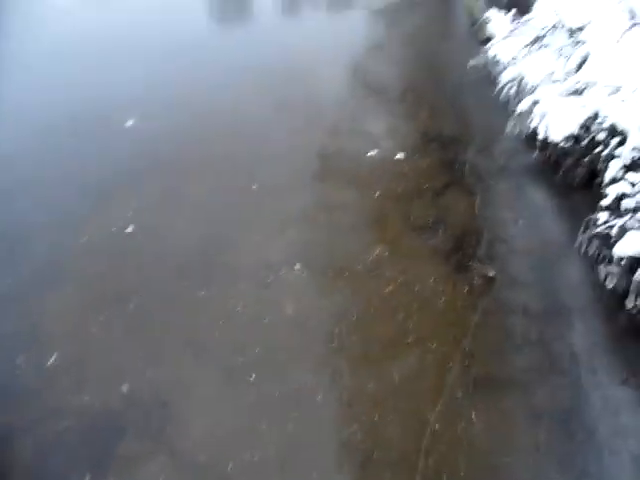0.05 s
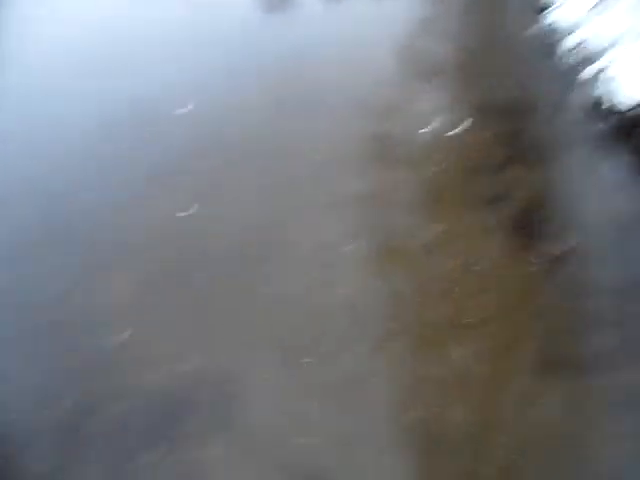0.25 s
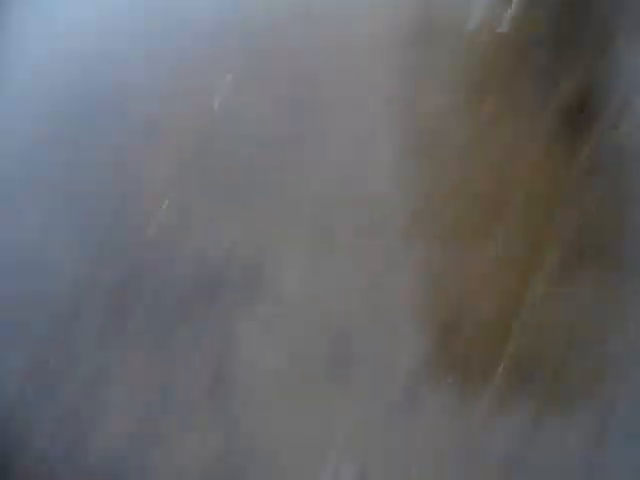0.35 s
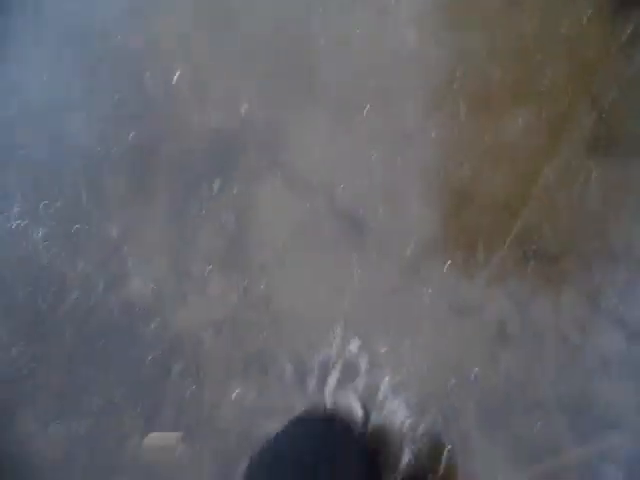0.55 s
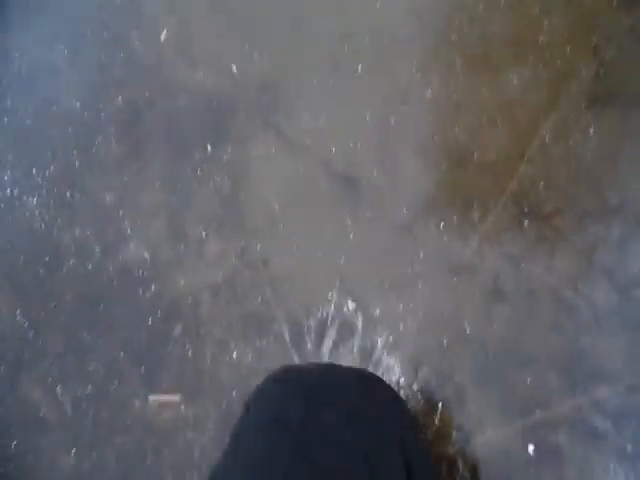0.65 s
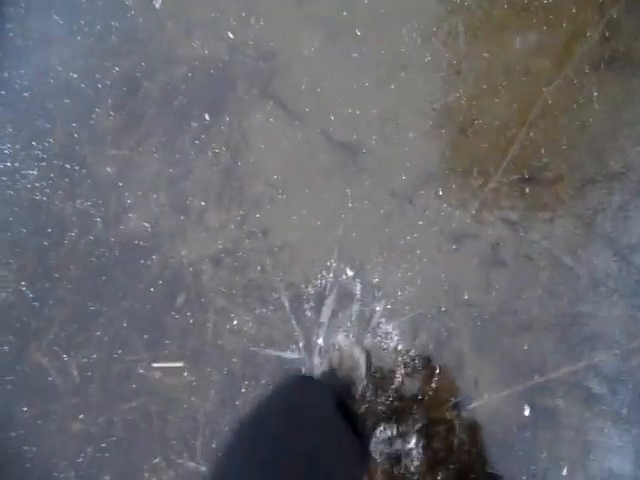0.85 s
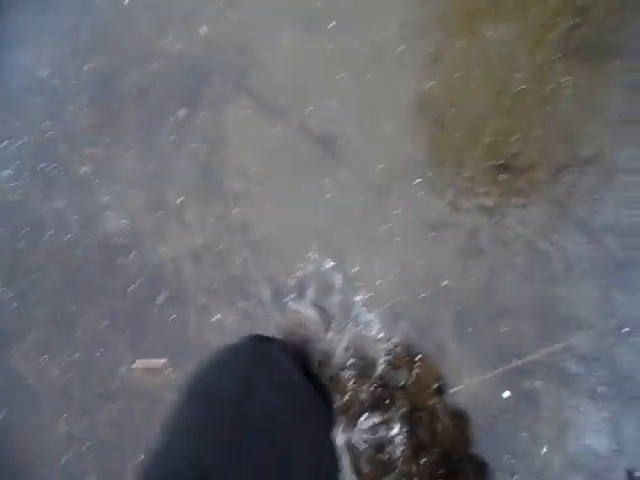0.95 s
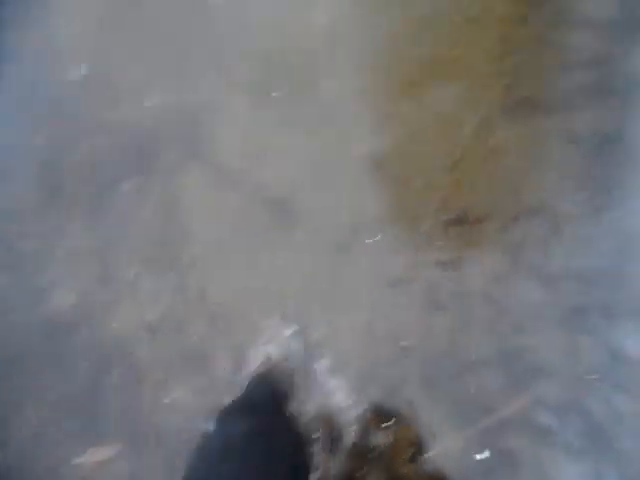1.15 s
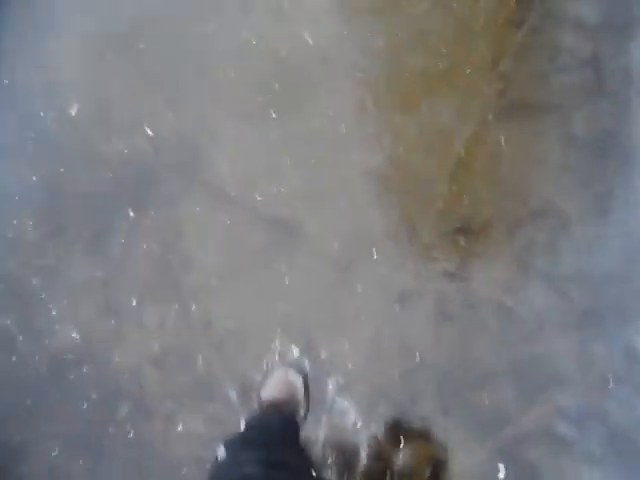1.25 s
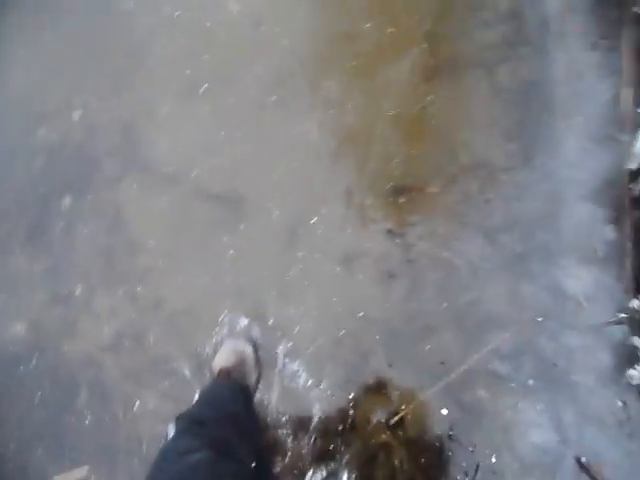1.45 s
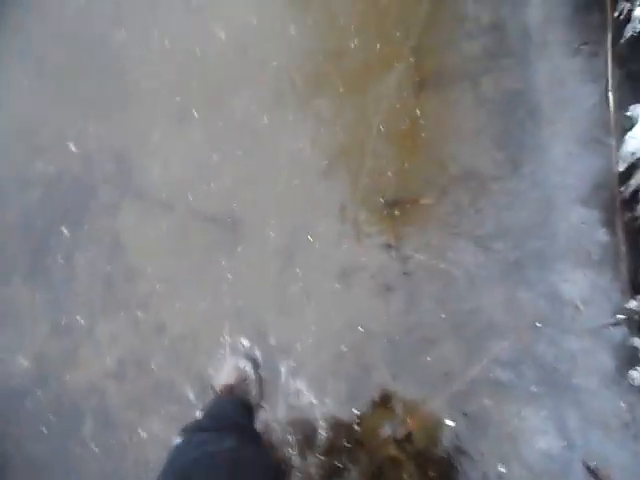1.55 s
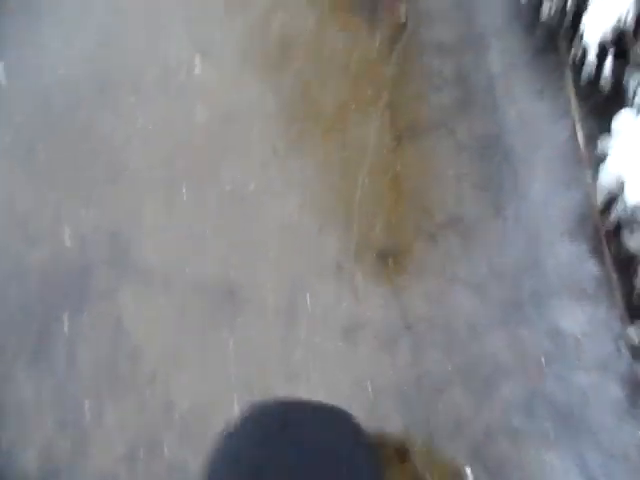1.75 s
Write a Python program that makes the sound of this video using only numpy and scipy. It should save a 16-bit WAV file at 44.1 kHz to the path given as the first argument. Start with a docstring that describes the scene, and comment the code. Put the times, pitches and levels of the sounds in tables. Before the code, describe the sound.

A boot stamps on a frozen lake with a dull, crunchy thump, and the ice gives one sharp crack. Two weaker stamps follow, with small ticks of ice chips and faint clothing swishes. Light wind rumbles on the close microphone.

```python
"""A light wind rumbles on the microphone over a frozen lake. Clothing swishes by friction as a leg swings,
and ice chips tick. A boot stamps: heel and sole excite the damped modes of the ice, the bank echoes
faintly, the crust crunches in many tiny fractures and the floating sheet heaves slowly. The ice then
gives one sharp, brittle crack. Two weaker stamps follow, the last with two slight cracks, and a few
more ticks and swishes sound over the wind."""
import sys
import numpy as np
from scipy import signal
from scipy.fft import rfft, irfft, next_fast_len
from scipy.io import wavfile
from scipy.ndimage import map_coordinates

SR = 44100
rng = np.random.default_rng(int(sys.argv[2]) if len(sys.argv) > 2 else 0)


def transcribe(u):
    """Save the signal u as a 16-bit wav file named by the first command-line argument.

    u: samples, shape (n,) or (channels, n), limited to [-1, 1]; the rate is SR.
    q: integer samples, one column per channel.
    """
    v = np.clip(np.atleast_2d(u).T, -1, 1)
    q = np.round(v * 32767).astype(np.int16)
    wavfile.write(sys.argv[1], SR, q)


N = 79380
TOP_HZ = 16200  # band limit
# acoustic shadow at the right microphone, which is shaded from the boot (f/Hz, gain/dB)
SHADOW = [(200, -1), (700, -0.8), (1600, -7.5), (3600, -6.5), (6000, -14), (9000, -17), (14000, -37)]


def amp(db):
    """Amplitude ratio of a level in decibels."""
    return 10 ** (np.asarray(db) / 20)


def unit(x):
    """Normalisation to rms 1."""
    return x / np.sqrt(np.mean(x ** 2) + 1e-20)


def since(start):
    """Seconds elapsed since an onset, zero before it."""
    return np.maximum(np.arange(N) / SR - start, 0)


def fade(t, t60):
    """Exponential decay: 60 dB in t60 seconds."""
    return np.exp(-np.log(1000) * t / t60)


def curve(rows):
    """Linear interpolation of (t/s, value) rows at every sample."""
    return np.interp(np.arange(N) / SR, *np.transpose(rows))


def wander(per_s):
    """Smooth random modulation: a spline through per_s Gaussian values a second."""
    return map_coordinates(rng.standard_normal(N), [np.arange(N) / SR * per_s])


def colour(x, points):
    """Minimum-phase filter through (f/Hz, gain/dB) points."""
    size = 2 * next_fast_len(N // 2 + SR // 4)
    hz, db = np.transpose(points)
    gain = amp(np.interp(np.log(np.fft.rfftfreq(size, 1 / SR) + 1), np.log(hz), db))
    cepstrum = irfft(np.log(gain), size)
    cepstrum[1:size // 2] *= 2  # folding onto positive time makes the filter causal
    cepstrum[size // 2 + 1:] = 0
    return irfft(rfft(x, size) * np.exp(rfft(cepstrum)), size)[..., :N]


def cut(x, hz, kind, order=2):
    """Butterworth low-pass or high-pass filter."""
    return signal.sosfilt(signal.butter(order, hz, kind, fs=SR, output='sos'), x)


def band(hz, q):
    """Response of one resonator to white noise, at rms 1."""
    resonator = signal.iirpeak(hz, q, fs=SR)
    return unit(signal.lfilter(*resonator, rng.standard_normal(N)))


def rush(spectrum, side_db):
    """Partly coherent stereo noise of rms 1: sum and difference of mid and side."""
    mid, side = colour(rng.standard_normal((2, N)), spectrum)
    return unit(np.array([mid + amp(side_db) * side, mid - amp(side_db) * side]))


def wind():
    """Flow noise: moving air gives a broad rush, and its gusts an uneven rumble on the microphone."""
    # spectra of the rush and the rumble (f/Hz, gain/dB)
    air_spectrum = [(40, 6.5), (160, 5.5), (300, -1.5), (600, -4.5), (1000, -10.5), (1500, -6.5),
                    (2500, -15), (5000, -22.5), (13000, -28.5)]
    rumble_spectrum = [(12, -4.5), (25, 6), (42, -9.5), (62, -4), (100, -22), (200, -33), (500, -69.5)]
    # their slow envelopes (t/s, relative level/dB)
    air_level = [(0, -63.5), (.2, -61.5), (.45, -71.5), (.75, -68.5), (1.1, -72.5), (1.36, -67.5),
                 (1.8, -62)]
    rumble_level = [(0, -52), (.35, -55), (.55, -51), (.95, -60), (1.3, -55), (1.8, -52.5)]
    air_gain_db, gust_db = 5, 4.5 * wander(per_s=11.84)
    air = amp(curve(air_level) + air_gain_db) * rush(air_spectrum, side_db=-9.5)
    rumble = amp(curve(rumble_level) + gust_db) * rush(rumble_spectrum, side_db=-14.5)
    return air + rumble


def clothing():
    """Stick-slip friction: fabric and sole rub as the leg swings, giving a resonance over a hiss."""
    # Gaussian swells (centre t/s, standard deviation/s, level/dB, f/Hz, Q, relative hiss level/dB)
    swishes = [(0.102, 0.012, -57, 560, 2.9, -9), (0.157, 0.021, -51.5, 2240, 3.8, -26.5),
               (0.273, 0.044, -57, 1070, 2.5, -5), (0.658, 0.13, -69.5, 4100, 1.9, -2.5),
               (1.099, 0.065, -65, 4770, 1.5, -19.5), (1.499, 0.016, -61, 4550, 6.1, -18.5),
               (1.573, 0.05, -59, 4610, 3.8, -4)]
    # spectrum of the friction hiss (f/Hz, gain/dB)
    hiss_spectrum = [(300, -17), (900, -7.5), (1450, 18.5), (2800, 1), (6000, -14), (12000, -6.5),
                     (15000, -28.5)]
    hiss = unit(colour(rng.standard_normal(N), hiss_spectrum))
    stick_slip_db = 2 * wander(per_s=160)
    t, out = np.arange(N) / SR, np.zeros(N)
    for centre, width, db, hz, q, hiss_db in swishes:
        swell = amp(db) * np.exp(-((t - centre) / width) ** 2 / 2)
        out += swell * (band(hz, q) + amp(hiss_db) * hiss)
    return amp(stick_slip_db) * out


def chips():
    """Impulsive excitation: ice chips snap and land, each a decaying burst of band noise."""
    # ticks of chips and grit (t/s, level/dB, f/Hz, t60/s, left minus right/dB)
    ticks = [(0.1005, -47, 1720, 0.015, -7), (0.1118, -46.5, 2150, 0.018, -7),
             (0.2387, -29, 3270, 0.0094, -20), (0.2707, -47.5, 9000, 0.0094, 1),
             (.652, -55, 7500, 0.012, -6), (.8162, -31, 5900, 0.0085, -8), (0.827, -30.5, 9000, 0.012, -10),
             (.8320, -34.5, 1550, 0.008, -4), (0.8516, -36, 4870, 0.019, -6),
             (0.9986, -51.5, 1760, 0.008, -12), (1.3200, -43, 4220, 0.0093, -13),
             (1.344, -52.5, 1380, 0.02, -1), (1.4481, -49, 7600, 0.053, -5),
             (1.4581, -51, 1630, 0.014, -10), (1.481, -48, 1970, 0.0038, 11),
             (1.5002, -37.5, 7140, 0.0046, -7), (1.7481, -45.5, 8200, 0.0038, 0)]
    out = np.zeros((2, N))
    for start, db, hz, t60, pan_db in ticks:
        t = since(start)
        pan = amp([[pan_db / 2], [-pan_db / 2]])
        out += amp(db) * pan * (t > 0) * fade(t, t60) * band(hz, q=1.32)
    return out


def thumps():
    """Damped modal vibration: each contact rings the sheet and crushes grit; soft contacts are duller."""
    # heel and sole contacts (t/s, level/dB, ratio applied to the mode frequencies, low-pass f/Hz)
    contacts = [(.2252, -6, 1.198, 680), (.2280, -25.5, 0.76, 5000), (0.2305, -21, 1.37, 893),
                (0.2318, -13, 0.63, 344), (0.8081, -9, 0.98, 980), (0.9994, -50, 1.23, 1800),
                (1.2057, -27.5, 0.95, 605), (1.2107, -27, 0.84, 259), (1.2126, -35, 0.96, 800),
                (1.2149, -21.5, 0.67, 148), (1.2191, -24, 1.05, 148)]
    # modes of the ice under the boot (base f/Hz, relative level/dB, t60/s)
    modes = [(276, -4.5, 0.013), (642, 7, 0.0065), (1534, 4, 0.009), (1723, -2, 0.011), (3310, -7, 0.0083)]
    press_s = 0.00059  # time constant of the rubber pressing home
    out = np.zeros(N)
    for start, db, pitch, dull_hz in contacts:
        t = since(start)
        ring = sum(amp(mode_db) * fade(t, t60) * np.sin(2 * np.pi * hz * pitch * t)
                   for hz, mode_db, t60 in modes)
        grit = amp(-16) * fade(t, t60=0.0047) * band(4190, q=0.81)
        press = 1 - np.exp(-t / press_s)
        out += amp(db) * press * (cut(ring, dull_hz, 'low', order=1) + grit)
    return cut(out, 163, 'high')


def bank_echo(x):
    """Diffuse scattering: the snowy bank answers faintly, with decaying noise as its impulse response."""
    # spectrum of the scattered sound (f/Hz, gain/dB)
    echo_spectrum = [(150, -31), (500, -8.5), (1100, -12.5), (3000, 12), (10000, 0)]
    tail = colour(rng.standard_normal((2, N)), echo_spectrum) * fade(since(0), t60=0.465)
    tail /= np.linalg.norm(tail[0])
    return amp(-26) * signal.fftconvolve(x[None], tail, axes=1)[:, :N]


def crunch():
    """Shot noise: tiny fractures of the crust merge in a burst that swells under the weight, then dies."""
    # loading by each stamp and by the settling boot (t/s, level/dB, rise/s, t60/s)
    loads = [(0.2296, -26.5, 0.0061, 0.07), (0.8065, -34.5, 0.0085, 0.091), (1.204, -49, 0.0073, 0.21),
             (1.292, -58.5, 0.024, 0.1)]
    # spectrum of the breaking crust (f/Hz, gain/dB)
    crust_spectrum = [(100, -31.5), (330, 5.5), (720, 3), (1050, 0.5), (1700, 1.5), (2500, -3),
                      (3400, -3.5), (6000, -8.5), (12500, -17), (14500, -26), (16000, -39)]
    grains_per_s, spread_db = 11000, 2
    grains = (rng.random(N) < grains_per_s / SR) * rng.choice([-1, 1], N)
    strength = amp(spread_db * rng.standard_normal(N))
    envelope = sum(amp(db) * np.minimum(since(start) / rise, 1) * fade(since(start + rise), t60)
                   for start, db, rise, t60 in loads)
    return envelope * unit(colour(grains * strength, crust_spectrum))


def heave():
    """Damped free oscillation: the stamped sheet sinks and swings back on the water."""
    # one oscillation per stamp (t/s, level/dB, f/Hz, t60/s)
    heaves = [(0.234, -25.5, 22.3, 0.22), (0.817, -29.5, 28.3, 0.19), (1.222, -34, 20.4, 0.34)]
    swing = sum(-amp(db) * fade(since(start), t60) * np.sin(2 * np.pi * hz * since(start))
                for start, db, hz, t60 in heaves)
    return cut(swing, 158.3, 'low')


def cracks():
    """Brittle fracture: each split gives a small pressure pulse, a brief high ring and dry splintering."""
    # one loud split, two slight ones as the boot shifts
    # (t/s, level/dB, ratio applied to the mode frequencies, added left minus right/dB)
    splits = [(0.4165, -3, 0.99, 0), (1.1981, -36, 0.91, -23), (1.3205, -36.5, 0.915, -23)]
    # modes of a split (base f/Hz, relative left level/dB, relative right level/dB, t60/s)
    modes = [(2370, -39.5, -26.5, 0.0071), (3410, -29, -10.5, 0.0016), (4760, -46, -20, 0.0059),
             (6220, -9.5, -25, 0.0012), (8230, -12.5, -57, 0.0035), (10200, -12, -54, 0.0021)]
    pulse_db, pulse_s = -20.5, 0.000093
    snaps, pulses = np.zeros((2, N)), np.zeros(N)
    for start, db, pitch, pan_db in splits:
        t = since(start)
        pulses += amp(db + pulse_db) * (t > 0) * np.exp(-t / pulse_s)
        ring = sum(amp([[left_db], [right_db]]) * fade(t, t60) * np.sin(2 * np.pi * hz * pitch * t)
                   for hz, left_db, right_db, t60 in modes)
        burst = amp(-27) * (t > 0) * fade(t, t60=0.01) * band(5600, q=1)
        splinters = np.array([burst, colour(burst, SHADOW)])
        pan = amp([[pan_db / 2], [-pan_db / 2]])
        snaps += amp(db) * pan * (ring + splinters)
    return cut(snaps, 2294, 'high', order=8) + cut(pulses, 150, 'high', order=1)


def scene():
    """Superposition: boot and leg are close and a little to the left; the wind is all round."""
    stamps = thumps() + crunch()
    left, right = stamps + heave() + clothing() + chips()
    return np.array([left, colour(right, SHADOW)]) + cracks() + bank_echo(stamps) + wind()


def record(dry):
    """Band limiting: the top treble rolls off, and nothing passes above TOP_HZ."""
    soft = cut(dry, 13150, 'low', order=6)
    size = next_fast_len(N + SR // 2)
    passband = np.fft.rfftfreq(size, 1 / SR) < TOP_HZ
    return irfft(rfft(soft, size) * passband, size)[:, :N]


dry = scene()
out = record(dry)
transcribe(out)
```